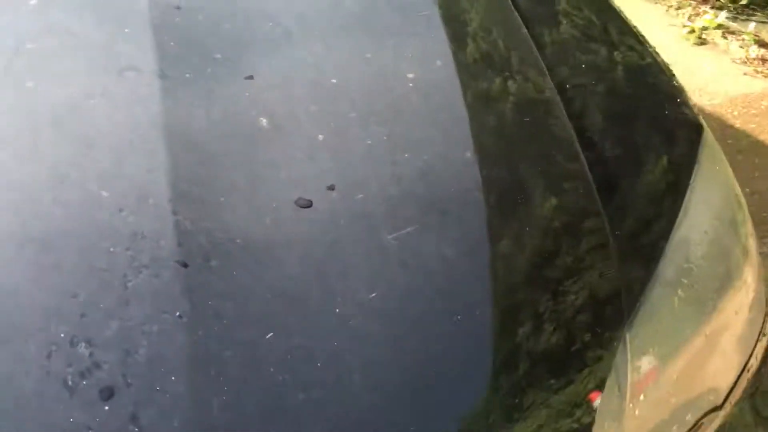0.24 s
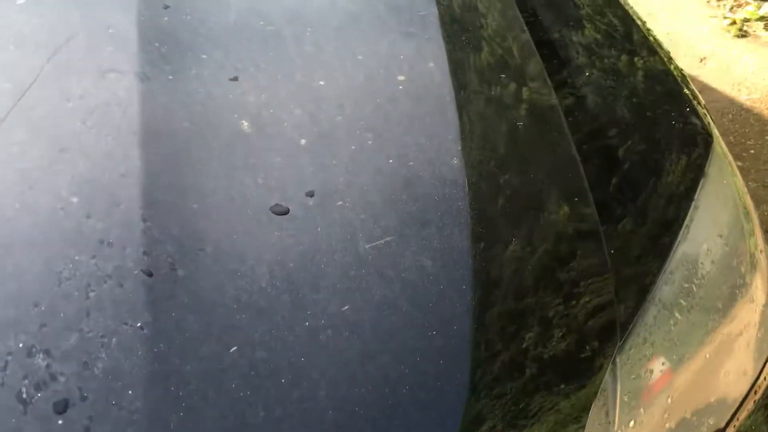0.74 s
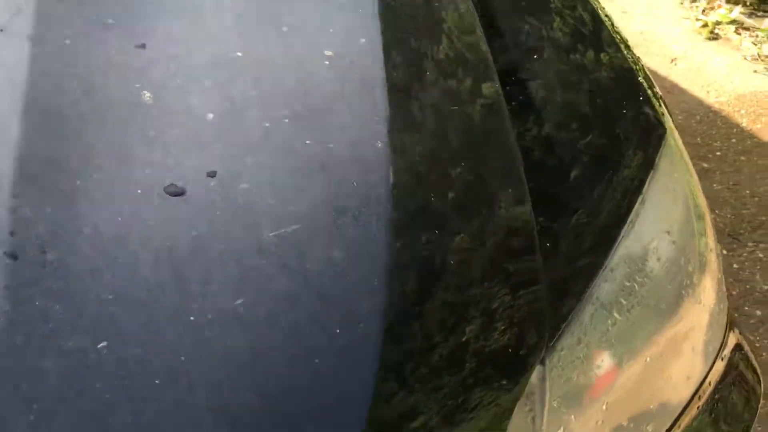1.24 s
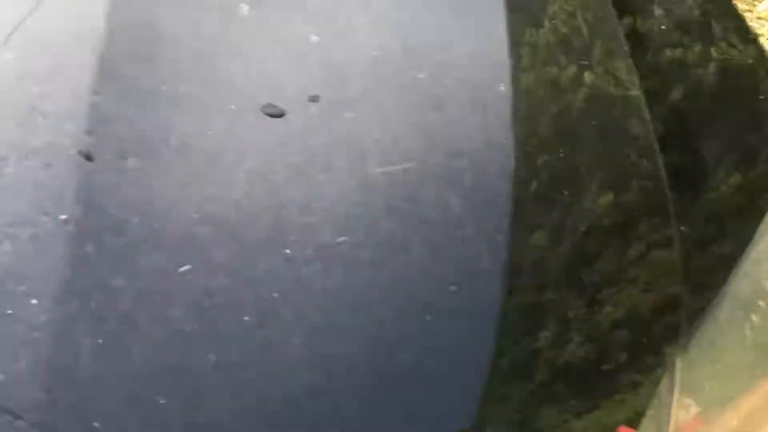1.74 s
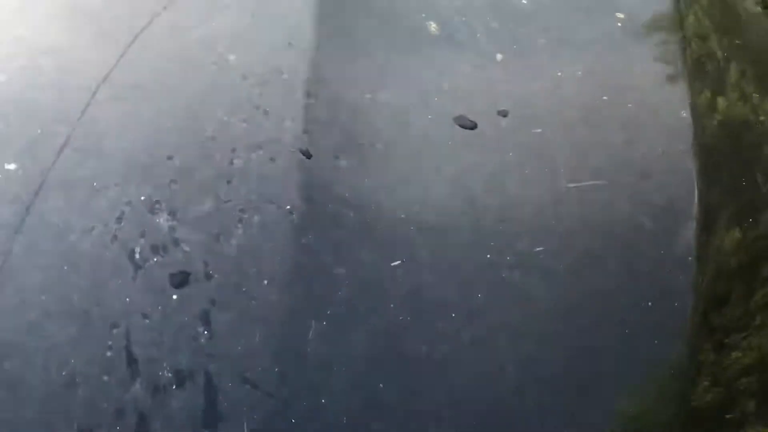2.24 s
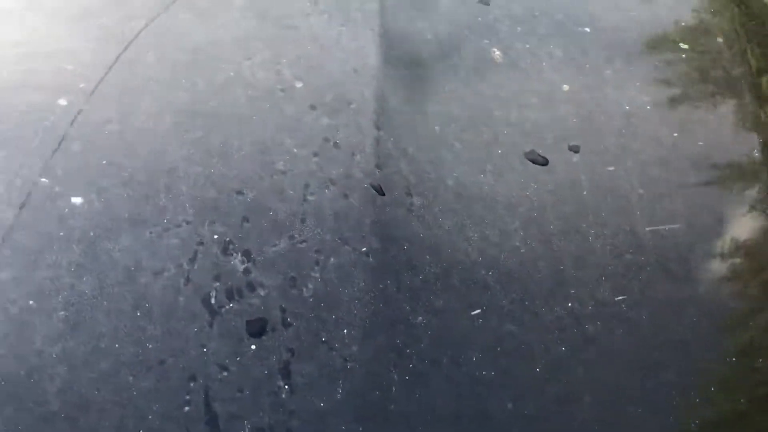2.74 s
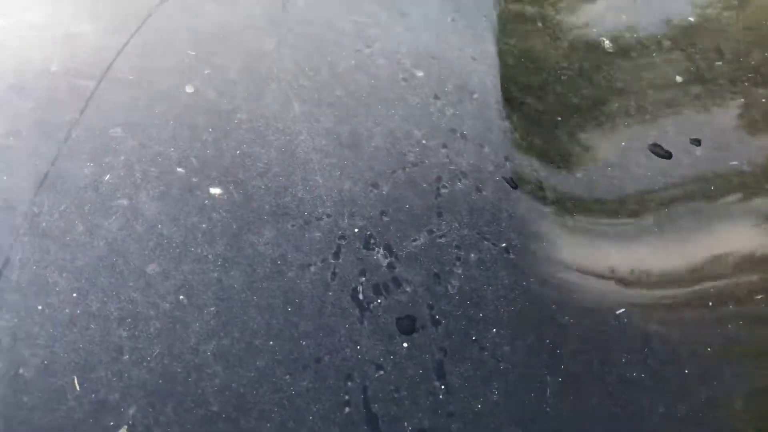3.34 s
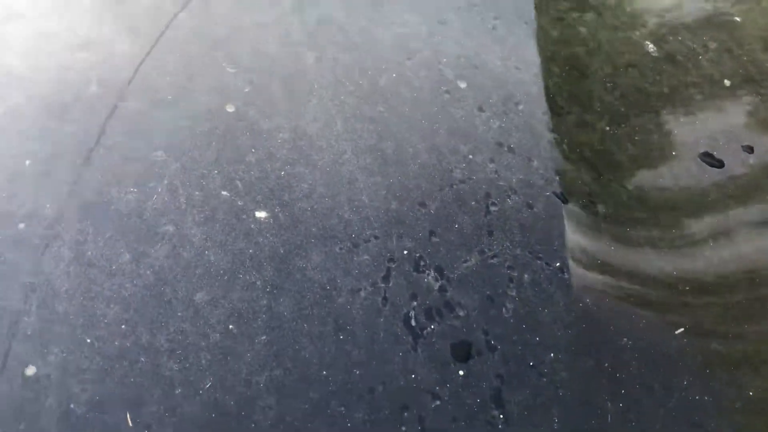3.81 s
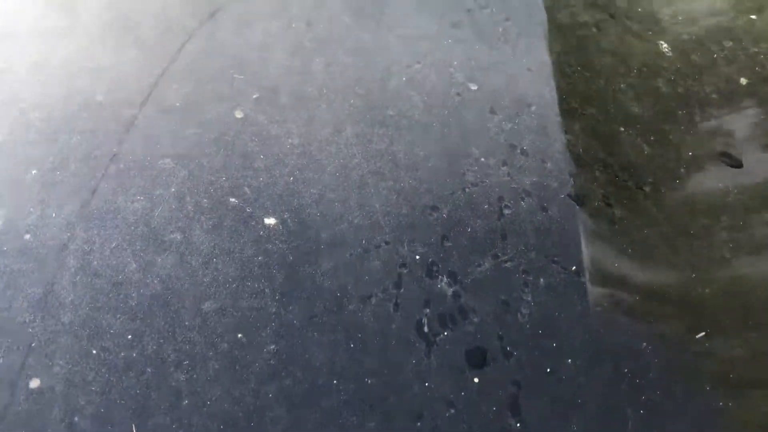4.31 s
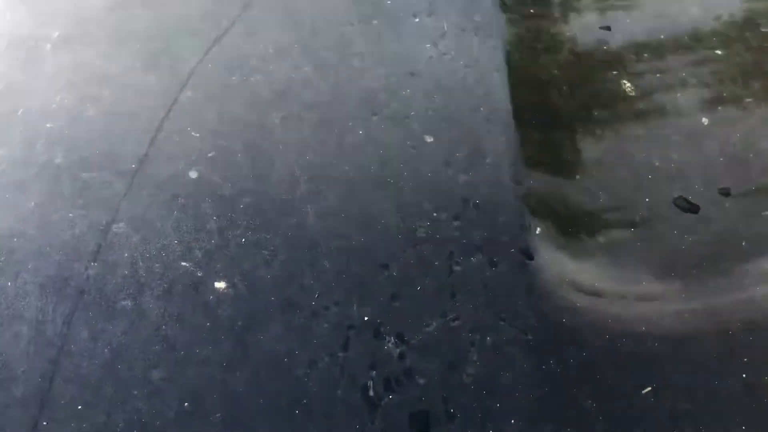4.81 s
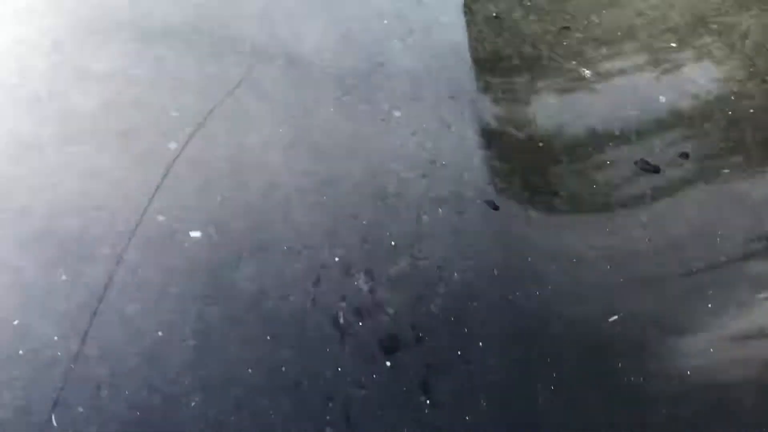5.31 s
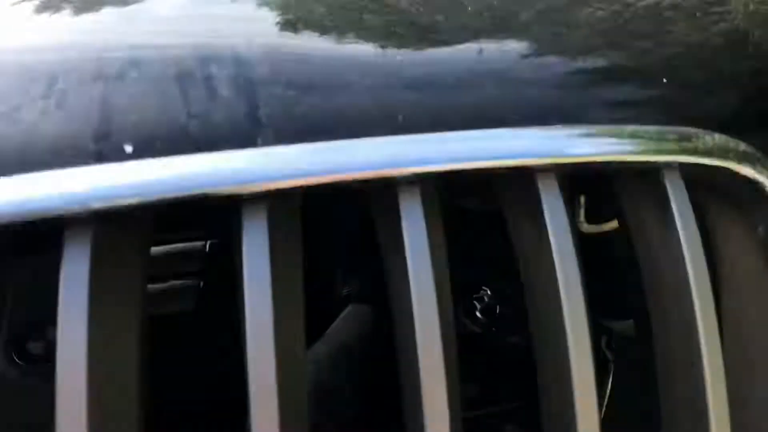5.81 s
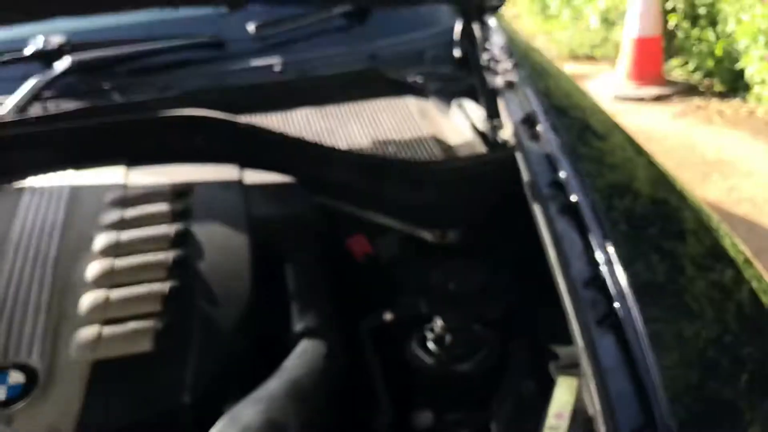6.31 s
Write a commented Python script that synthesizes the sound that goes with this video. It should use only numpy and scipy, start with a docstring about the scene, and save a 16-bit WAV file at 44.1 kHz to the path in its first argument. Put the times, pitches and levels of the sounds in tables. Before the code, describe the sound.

Light outdoor wind rumble and a faint distant hiss run throughout, close and dry. From about 0.1 s a release cable rasps in a quickening run of tiny snaps, clicking at 0.3 s; at 0.38-0.45 s the catch lets go with a bright crack and a deep, hollow boom from the bonnet, the loudest moment. A crisp double clunk follows at 0.8 s, with a small scrape near 1.05 s, then mostly wind. Firm double knocks land at 2.35 and 2.5 s, duller ones around 3.65 s, further clunks at 4.05 and 4.2 s, and a hard one at 4.7 s. Small ticks, short rubs and low panel murmurs sit around them. Softer thuds at 5.1 and 5.3 s free the lid. From about 5.5 to 6.5 s it rises quietly, with soft wavering strut hiss and very faint, thin, high squeaks.

```python
"""Light wind and distant outdoor noise lie under everything; then a car bonnet's release scrapes and clicks.
The catch lets go and the lid jumps with a boom: contacts strike sine modes and bands of decaying noise.
Worked against its safety hook, the lid clunks in pairs, with sliding grains and a murmuring panel between.
It finally rises on softly hissing struts, made of resonant noise, with thin gliding sine whistles."""
import sys
import numpy as np
from scipy import signal
from scipy.io import wavfile

SR = 44100
rng = np.random.default_rng(int(sys.argv[2]) if len(sys.argv) > 2 else 0)


def unload_audio(sound):
    """Save the sound as a 16-bit wav file, at the path given as the first command line argument."""
    columns = np.transpose(np.atleast_2d(sound))
    # keep every value between -1 and 1, then stretch to whole-number steps
    steps = np.round(np.clip(columns, -1, 1) * 32767)
    wavfile.write(sys.argv[1], SR, steps.astype(np.int16))


N = 289027
TIME = np.arange(N) / SR
BAND_EDGES = 28 * 2 ** np.arange(0, 9.6, .5)   # Hz, half-octave steps


def from_db(db):
    """Decibels to gain."""
    return 10 ** (np.asarray(db) / 20)


def rms_one(x):
    """Scale to unit rms."""
    return x / np.sqrt(np.mean(x ** 2) + 1e-20)


def at_hz(hz, points_hz, values):
    """Read a spectrum on a log-frequency axis."""
    return np.interp(np.log(hz), np.log(points_hz), values)


def drift(rate):
    """Random wander at unit rms: straight lines between `rate` random points a second."""
    knots = rng.standard_normal(int(N / SR * 3000))
    return rms_one(np.interp(TIME * rate, np.arange(len(knots)), knots))


def bands():
    """Half-octave bands: centre, filter, and the gain that brings white noise to unit rms."""
    for low, high in zip(BAND_EDGES, BAND_EDGES[1:]):
        band_filter = signal.butter(2, [low, high], "band", fs=SR, output="sos")
        yield np.sqrt(low * high), band_filter, np.sqrt(SR / 2 / (high - low))


def clicks(times, sizes):
    """One impulse at each time."""
    out = np.full(N, 1e-18)
    np.add.at(out, np.round(np.asarray(times) * SR).astype(int), sizes)
    return out


def ring(force, hz, t60):
    """A mode as a two-pole resonator: a unit click starts a decaying sine of height 1."""
    radius = np.exp(-np.log(1000) / (t60 * SR))
    turn = 2 * np.pi * hz / SR
    return signal.lfilter([0, np.sin(turn)], [1, -2 * radius * np.cos(turn), radius ** 2], force)


def fade(energy, t60):
    """Energy that is put in dies away exponentially."""
    return signal.lfilter([1], [1, -np.exp(-2 * np.log(1000) / (t60 * SR))], energy)


def soften(x, seconds):
    """One-pole smoothing."""
    r = np.exp(-1 / (seconds * SR))
    return signal.lfilter([1 - r], [1, -r], x)


def strokes(spans, sizes):
    """A rounded swell over each span."""
    out = np.zeros(N)
    for (start, end), size in zip(spans, sizes):
        first, last = int(start * SR), int(max(end, start + .005) * SR)
        out[first:last] += size * np.hanning(last - first) ** .25   # low power: quick edges, flat middle
    return out


def strengths(levels_db, levels_hz, hz):
    """How hard each event drives this frequency."""
    return from_db([at_hz(hz, levels_hz, row) for row in levels_db])


def crash(events, events_hz, body, rise_s, tail_db, chatter_db, chatter_rate):
    """Each contact wakes a crowd of modes: chattering noise with a fast crash, then a weaker tail."""
    events = np.array(events)
    body_hz, body_db, crash_t60, tail_t60 = np.transpose(body)
    chatter = from_db(chatter_db * drift(chatter_rate))
    grains = rms_one(rng.standard_normal((2, N)) * chatter)
    out = np.zeros(N)
    for k, (hz, band_filter, unit) in enumerate(bands()):
        if 2 * hz < body_hz[0]:
            continue
        blows = clicks(events[:, 0], strengths(events[:, 1:], events_hz, hz) ** 2)
        first_crash = fade(blows, at_hz(hz, body_hz, crash_t60))
        tail = from_db(tail_db) ** 2 * fade(blows, at_hz(hz, body_hz, tail_t60))
        envelope = np.sqrt(soften(first_crash + tail, rise_s))
        gain = unit * from_db(at_hz(hz, body_hz, body_db))
        out += gain * signal.sosfilt(band_filter, grains[k % 2] * envelope)   # neighbours use separate noise
    return out


# Wind rumble on the microphone, before colour and trim: [t/s, level/dB]
WIND_RUMBLE = [(0, -56.5), (.6, -51), (1, -53.5), (1.6, -53), (2.3, -57.5), (4.9, -53.5), (5.3, -56.5),
               (6.55, -61.5)]
# Far hiss, before colour and trim: [t/s, level/dB]
FAR_HISS = [(1.1, -68), (1.6, -63.5), (2.24, -65.5), (2.57, -62.5), (3.36, -65.5), (4.21, -67.5),
            (4.41, -67.5), (6.14, -65.5), (6.55, -69)]
# Centres of the four air layers, wind, murmur, hiss treble and hiss top: [f/Hz]
AIR_LAYER_HZ = [70, 700, 3200, 10000]
# Fixed tone colour of the open air: [f/Hz, level/dB per band]
AIR_TONE = [(30, -31), (42, -2.5), (62, 0.5), (110, -6.5), (170, -6.5), (300, -5.5), (500, -11.5),
            (900, -5.5), (1800, -10), (4000, -6), (7000, -3), (10500, -6.5), (15000, -4)]
MURMUR_DB = -60   # steady middle layer, before colour and trim
HISS_TREBLE_DB, HISS_TOP_DB = 3, -4.5   # relative to FAR_HISS


def outdoors(level_db, gust_db, flutter_db):
    """Lumpy wind in the bass under a murmur and a far hiss whose level slowly shifts, all banded noise."""
    white, out = rng.standard_normal((2, N)), np.zeros(N)
    gusts, flutter = from_db(gust_db * drift(23)), from_db(flutter_db * drift(7.9))
    wind = np.interp(TIME, *np.transpose(WIND_RUMBLE))
    hiss = np.interp(TIME, *np.transpose(FAR_HISS))
    layers_db = [wind, MURMUR_DB, hiss + HISS_TREBLE_DB, hiss + HISS_TOP_DB]
    for k, (hz, band_filter, unit) in enumerate(bands()):
        # each row of the identity matrix gives one layer's share at this frequency
        shares = [at_hz(hz, AIR_LAYER_HZ, row) for row in np.eye(len(AIR_LAYER_HZ))]
        blend_db = sum(share * db for share, db in zip(shares, layers_db))
        level = from_db(blend_db) * (gusts if hz < 250 else flutter)
        gain = unit * from_db(level_db + at_hz(hz, *np.transpose(AIR_TONE)))
        out += gain * signal.sosfilt(band_filter, white[k % 2] * level)
    return out


# Where the levels of snaps and slides are set: [f/Hz]
SMALL_PART_HZ = [900, 3200, 10000]


def tilted(db, brightness, colour_db):
    """A small part's levels at SMALL_PART_HZ, tilted in dB per octave about the middle one."""
    octaves = np.log2(np.array(SMALL_PART_HZ) / SMALL_PART_HZ[1])
    return db + np.array(colour_db) + brightness * octaves


# Cable, hook and seals sliding, before colour: [from t/s, to t/s, level/dB, brightness/dB per octave]
SLIDES = [(0.031, 0.076, -55.5, 4), (0.105, 0.26, -49, 4), (0.246, 0.344, -54, -1),
          (0.408, 0.441, -32.5, -2.5), (1.028, 1.083, -44, 0), (2.108, 2.152, -59.5, -7.5),
          (2.224, 2.239, -47.5, -1), (2.746, 2.781, -49.5, -2), (2.877, 2.901, -49, -2.5),
          (3.984, 4.014, -51, 2), (4.767, 4.833, -54.5, -10.5), (4.879, 4.894, -51, -4),
          (5.053, 5.096, -52.5, -3), (6.108, 6.125, -55, -3), (6.186, 6.2, -56, 5)]
# An ordinary slide, one value for each SMALL_PART_HZ: [level/dB]
SLIDE_TONE_DB = [-6, 1, -8.5]
# Fixed tone colour of the sliding: [f/Hz, level/dB per band]
SLIDE_BODY = [(100, -10.5), (400, -9), (1200, -11.5), (4000, -10.5), (9000, -6.5), (15000, -10)]


def rubbing(grain_db, grain_rate):
    """Sliding parts catch and slip in tiny grains: roughened noise under each stroke's pressure."""
    rows = np.array([(start, end, *tilted(db, brightness, SLIDE_TONE_DB))
                     for start, end, db, brightness in SLIDES])
    roughness = from_db(grain_db * drift(grain_rate))
    grains = rms_one(rng.standard_normal((2, N)) * roughness)
    out = np.zeros(N)
    for k, (hz, band_filter, unit) in enumerate(bands()):
        if hz > SLIDE_BODY[0][0]:
            pressure = strokes(rows[:, :2], strengths(rows[:, 2:], SMALL_PART_HZ, hz)) + 1e-12
            gain = unit * from_db(at_hz(hz, *np.transpose(SLIDE_BODY)))
            out += gain * signal.sosfilt(band_filter, grains[k % 2] * pressure)
    return out


# Small latch parts snapping, before colour: [t/s, level/dB, brightness/dB per octave]
LATCH_TICKS = [(.296, -36.5, -.2), (.341, -42.5, 8.5), (.363, -43.5, -0.5), (.390, -23.5, 1.5),
               (0.448, -22.5, 0), (.527, -45, 3.5), (0.555, -39, 1), (0.584, -56, -4), (0.714, -48.5, -2),
               (.839, -32, 4), (1.039, -43, 3.5), (2.214, -42, -1.5), (2.503, -41, 6.5),
               (2.522, -32.5, 2.5), (3.221, -57.5, 5), (3.941, -37.5, -2), (4.021, -44.5, 5),
               (4.071, -43, 8.5), (4.132, -50.5, 2.5), (4.199, -32.5, -1.5), (4.226, -49, 8.5),
               (4.410, -53, 6.5), (4.703, -38, 5), (4.811, -50, -10), (5.354, -49.5, 4),
               (6.003, -71.5, 19.5)]
# An ordinary snap, one value for each SMALL_PART_HZ: [level/dB]
SNAP_TONE_DB = [0, 2, -4]
# The release cable takes up its slack in a quickening run of snaps
CABLE_START_S, CABLE_GAP_S = .1195, .0145   # first snap; first gap
GAP_SHRINK = .8   # each next gap as a share of the one before
CABLE_DB, CABLE_GROWTH_DB, CABLE_BRIGHTNESS = -39.5, 0.27, -0.72   # first snap; gain per snap; dB per octave


def snaps(cable_count):
    """Single snaps and the cable's run: rows of time and dB at SMALL_PART_HZ."""
    run = []
    for k in range(cable_count):
        start = CABLE_START_S + CABLE_GAP_S * sum(GAP_SHRINK ** np.arange(k))
        run.append((start, CABLE_DB + k * CABLE_GROWTH_DB, CABLE_BRIGHTNESS))
    return [(s, *tilted(db, brightness, SNAP_TONE_DB)) for s, db, brightness in LATCH_TICKS + run]


# Ring of the small parts: [f/Hz, level/dB per band, t60 of first crash/s, t60 of tail/s]
LATCH_BODY = [(150, -21, 0.0084, .12), (520, -9.5, 0.028, 0.21), (1500, -2, 0.0084, 0.13),
              (3970, -1.5, 0.012, 0.041), (5950, -2.5, 0.028, 0.11), (9100, -3.5, 0.017, 0.068),
              (14330, 3.5, 0.0016, 0.027)]


def latch_snaps():
    """Light latch parts snap: short, sharply rising noise bursts with fine chatter."""
    return crash(snaps(cable_count=6), SMALL_PART_HZ, LATCH_BODY,
                 rise_s=0.0003, tail_db=-15.0, chatter_db=3.0, chatter_rate=1500)


# The sheet flexes as the hand loads it, until it gives: [gives at t/s, level/dB before trim]
PANEL_LOADS = [(.37, -38.5), (0.421, -26.5), (.71, -41), (.90, -36.5), (2.356, -34.5), (2.837, -45.5),
               (3.646, -31.5), (3.698, -32.5), (3.96, -44.5), (4.072, -34), (4.841, -38.5), (5.09, -39),
               (5.269, -42.5), (5.372, -41.5)]
# Modes of the bonnet, also struck by the clunks: [f/Hz, relative level/dB, t60/s]
BONNET_MODES = [(51.3, -13, 0.57), (75, 14.5, 0.089), (102.9, -4.5, 0.33), (126.6, -2, 0.22),
                (206.1, 1, 0.13), (226.8, 4, 0.065), (298.7, -4.5, 0.17), (337, -4.5, 0.14),
                (377, -8.5, 0.21), (538, -8.5, 0.11), (715.6, -11.5, 0.2), (820, -9, 0.097),
                (907, 1.5, 0.049), (996, -15, 0.15), (1250, -9, 0.08), (1403, -12, 0.088),
                (1726, -6.5, 0.056), (1844, -13.5, 0.097), (2080, -46, 0.22), (2380, -12, 0.09),
                (2564, -8.5, 0.042), (2860, -25, 0.2), (3330, -16.5, 0.072), (4140, -13, 0.11),
                (3900, 1, 0.031), (4400, -14, 0.077), (5160, -45, 0.023), (5600, -5, 0.031),
                (7050, -8.5, 0.062), (9970, -6.5, 0.049)]
FLEX_SWELL_DB_PER_S, FLEX_RELEASE_DB_PER_S = 239, 598


def flexing(level_db, top_hz):
    """Dull friction at the seals drives the panel modes, swelling under load and dropping as the lid gives."""
    dull = signal.butter(2, [150, top_hz], "band", fs=SR, output="sos")
    friction = signal.sosfilt(dull, rng.standard_normal(N))
    murmur = np.zeros(N)
    for k, (hz, db, t60) in enumerate(BONNET_MODES):
        if 120 < hz < 600:
            murmur += from_db(db) * ring(friction, hz, t60) * (-1) ** k   # alternating polarity
    curves = []
    for s, db in PANEL_LOADS:
        fall_db = np.maximum(FLEX_SWELL_DB_PER_S * (s - TIME), FLEX_RELEASE_DB_PER_S * (TIME - s))
        curves.append(db - fall_db)
    load_db = np.max(curves, axis=0)
    return rms_one(murmur) * from_db(level_db + load_db)


# Double contacts: the lid strikes latch or hook, then seats and leaves one resonance standing out, levels
# before colour: [t/s, strike level/dB, hardness/dB per octave, weight/dB, seating delay t/s,
# seating level/dB, favoured f/Hz, favoured level/dB]
LID_CLUNKS = [(.381, -26.5, 3.5, 12, 0.0077, -29.5, 700, -23.5),
              (.412, -12.5, -4.5, 3, 0.035, -21, 2226, -24),
              (.454, -12, 0.46, 19.5, .019, -20.5, 393, -19.5), (.657, -38, -10, 25, .028, -37.5, 537, -44),
              (.819, -15.5, -2, -2.5, .020, -10, 2940, -30), (1.043, -33, 1, 7, 0.0059, -35, 161, -27.5),
              (2.351, -14, -0.7, -3, .019, -22.5, 206, -30), (2.501, -13, -0.54, 2, 0.018, -14, 875, -23.5),
              (3.641, -20, -.9, 6, 0.0042, -22, 205, -29), (3.686, -23.5, -0.4, 6, .0125, -16, 935, -29),
              (4.056, -16, -1.06, -4, .016, -16.5, 3360, -30.5),
              (4.186, -15, -0.4, 14, 0.013, -28, 5400, -46),
              (4.699, -15.5, -1.5, 2.5, 0.0036, -7.5, 930, -24.5),
              (4.775, -33, -2.2, 14, .016, -28.5, 4070, -49),
              (5.085, -21.5, -4, 3.5, 0.00194, -36, 367, -27),
              (5.283, -22, -3.5, -2, 0.0035, -41, 330, -24)]
# Where the levels of a blow are set: [f/Hz]
BLOW_HZ = [70, 250, 500, 900, 3200, 10000]
# An ordinary blow, one value for each BLOW_HZ: [level/dB]
BLOW_TONE_DB = [-16, -1, -12, -10.5, -11.5, -28]
# The lid's weight brings out its boom and its hollow note, one value for each BLOW_HZ: [share]
BLOW_WEIGHT = [1, 0, 1, 0, 0, 0]
PANEL_HZ = 264   # hardness tilts everything above this
SEAT_HARDER_DB, SEAT_LIGHTER_DB = 0.74, 9.5   # seating: added dB per octave; weight taken off in dB


def contacts():
    """Strike and seating of every clunk: rows of time and dB at BLOW_HZ."""
    octaves = np.maximum(np.log2(np.array(BLOW_HZ) / PANEL_HZ), 0)
    weight_share = np.array(BLOW_WEIGHT)
    seating = SEAT_HARDER_DB * octaves - SEAT_LIGHTER_DB * weight_share
    rows = []
    for s, strike_db, hardness, weight_db, gap, seat_db, *_ in LID_CLUNKS:
        colour = BLOW_TONE_DB + hardness * octaves + weight_db * weight_share
        rows.append((s, *(strike_db + colour)))
        rows.append((s + gap, *(seat_db + colour + seating)))
    return np.array(rows)


def bonnet_ring(level_db, vary_db, contact_cycles):
    """Every blow pushes all the lid's modes the same way; soft contact lets each build over a few cycles."""
    events, out = contacts(), np.zeros(N)
    chance = rng.standard_normal((len(events), len(BONNET_MODES)))
    for k, (hz, mode_db, t60) in enumerate(BONNET_MODES):
        sizes = strengths(events[:, 1:], BLOW_HZ, hz) * from_db(mode_db + vary_db * chance[:, k])
        force = clicks(events[:, 0], sizes)
        # taking away a faster-dying copy softens the onset
        out += ring(force, hz, t60) - ring(force, hz, min(contact_cycles / hz, t60 / 2))
    return from_db(level_db) * out


# Crowd of weaker lid modes: [f/Hz, level/dB per band, t60 of first crash/s, t60 of tail/s]
LID_BODY = [(45.3, -19.5, 0.046, 0.51), (72.6, -15.5, 0.34, 0.15), (134, -4, 0.056, 0.5),
            (270, -6.5, 0.056, 0.3), (453, -24, 0.093, 0.37), (769, -12, 0.17, 0.22),
            (1410, -13.5, 0.1, 0.16), (2480, -16.5, 0.054, 0.15), (3800, -7, 0.041, 0.21),
            (5900, -15, 0.023, 0.044), (9000, -3, 0.056, 0.041), (12000, -19, 0.016, 0.15),
            (15000, -4, 0.021, 0.17)]


def lid_clatter():
    """The blows also wake the lid's crowd of weaker modes, heard as bands of decaying noise."""
    return crash(contacts(), BLOW_HZ, LID_BODY,
                 rise_s=0.002, tail_db=-13.5, chatter_db=1.5, chatter_rate=650)


def favoured_rings(t60, contact_t60):
    """The one resonance that stands out of each clunk, swelling briefly and dying away."""
    out, age = np.zeros(N), TIME[:SR // 2]
    shape = np.exp(-np.log(1000) * age / t60) - np.exp(-np.log(1000) * age / contact_t60)
    for s, *_, gap, seat_db, hz, db in LID_CLUNKS:
        start = round((s + gap) * SR)
        out[start:start + len(age)] += from_db(db) * shape * np.sin(2 * np.pi * hz * age)
    return out


# Gas struts extending, before the resonances' own levels: [t/s, level/dB]
STRUT_FLOW = [(0, -120), (5.2, -100), (5.45, -85), (5.75, -69), (5.98, -65), (6.3, -66.5), (6.55, -65)]
# Resonances of the struts: [f/Hz, width f/Hz, relative level/dB]
STRUT_RESONANCES = [(341, 60, 4.5), (482, 45, 0.5), (577, 130, -14), (900, 80, -42), (13800, 8100, -1.5)]


def struts(waver_db):
    """Gas squeezes through the struts as the lid rises: noise through resonances that waver separately."""
    flow, rush = rng.standard_normal(N), np.zeros(N)
    for hz, width, db in STRUT_RESONANCES:
        resonance = rms_one(signal.lfilter(*signal.iirpeak(hz, hz / width, fs=SR), flow))
        rush += from_db(db + waver_db * drift(20)) * resonance
    return rush * from_db(np.interp(TIME, *np.transpose(STRUT_FLOW)))


# Hinge and strut whistles as the lid rises: [from t/s, to t/s, first f/Hz, last f/Hz, level/dB]
WHISTLES = [(5.375, 5.81, 13600, 13200, -77), (5.844, 6.15, 7860, 7950, -74),
            (6.082, 6.24, 3360, 3960, -68), (6.05, 6.18, 9600, 9550, -73), (6.29, 6.54, 7640, 7700, -72),
            (6.40, 6.53, 9600, 9600, -70)]


def squeaks(wobble_hz):
    """Thin gliding sine whistles that share one trembling of pitch."""
    tremble, out = wobble_hz * drift(300), np.zeros(N)
    for start, end, first_hz, last_hz, db in WHISTLES:
        hz = np.interp(TIME, [start, end], [first_hz, last_hz]) + tremble
        phase = 2 * np.pi * np.cumsum(hz) / SR
        out += strokes([(start, end)], [from_db(db)]) * np.sin(phase)
    return out


# Reflections inside the engine bay and off the ground, before power scaling: [delay t/s, gain]
NEAR_REFLECTIONS = [(.0019, 0.05), (.0034, 0.026), (.0057, 0.081), (.0091, -0.11), (0.0137, 0.09)]


def reflected(x):
    """Near surfaces smear each sound and comb its spectrum; the sum is scaled to hold its power."""
    echoes = sum(gain * np.interp(TIME - delay, TIME, x, left=0) for delay, gain in NEAR_REFLECTIONS)
    power = 1 + sum(gain ** 2 for delay, gain in NEAR_REFLECTIONS)
    return (x + echoes) / np.sqrt(power)


def scene():
    """The open air, the latch, the lid and its struts, mixed to one channel."""
    air = outdoors(level_db=-0.5, gust_db=1.0, flutter_db=0.35)
    sliding = rubbing(grain_db=-2.5, grain_rate=940)
    latch = latch_snaps()
    flex = flexing(level_db=0.5, top_hz=285)
    modes = bonnet_ring(level_db=-3.5, vary_db=0.95, contact_cycles=5.3)
    favoured = favoured_rings(t60=0.065, contact_t60=0.0027)
    clatter = lid_clatter()
    lift = struts(waver_db=4.5) + squeaks(wobble_hz=59)
    mix = air + reflected(sliding + latch + clatter) + flex + modes + favoured + lift
    return mix[None]


# Treble dips of the microphone: [f/Hz, width f/Hz, level/dB]
MICROPHONE_DIPS = [(6970, 3900, -3.5), (10440, 1760, -5.5), (14600, 1100, -3)]
CUTOFF_HZ = 16900   # stopband edge, 70 dB down


def record(dry):
    """The microphone drops the deepest bass and dips in the treble; the top is cut."""
    out = signal.sosfilt(signal.butter(4, 34, "high", fs=SR, output="sos"), dry)
    for hz, width, db in MICROPHONE_DIPS:
        out = out + (from_db(db) - 1) * signal.lfilter(*signal.iirpeak(hz, hz / width, fs=SR), out)
    return signal.sosfilt(signal.cheby2(14, 70, CUTOFF_HZ, fs=SR, output="sos"), out)


dry = scene()
out = record(dry)
unload_audio(out)
```